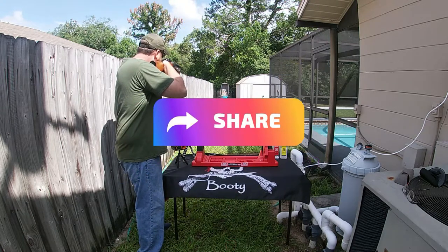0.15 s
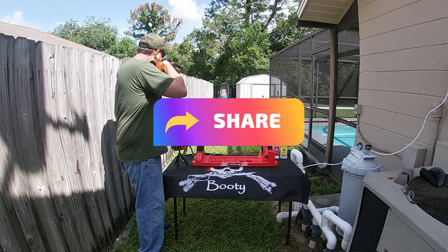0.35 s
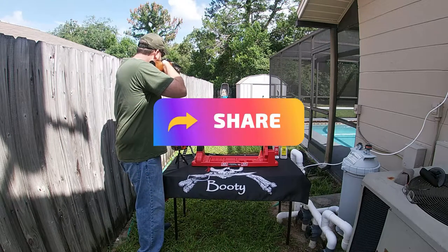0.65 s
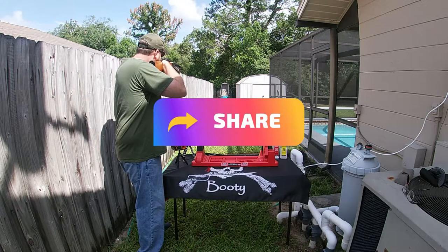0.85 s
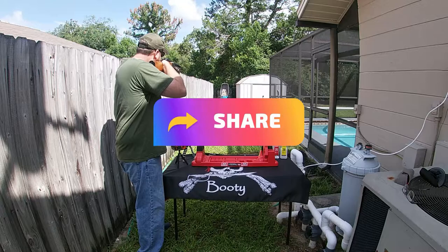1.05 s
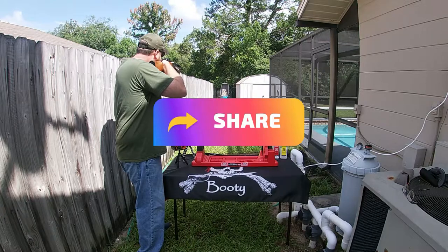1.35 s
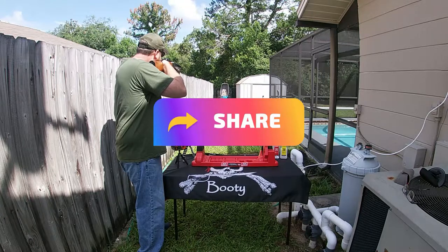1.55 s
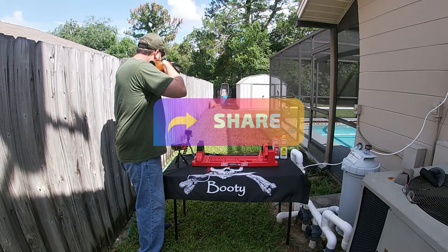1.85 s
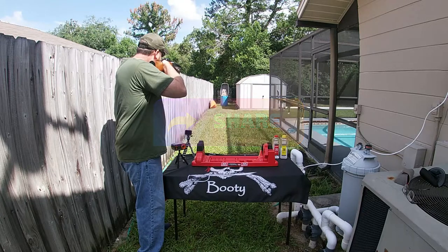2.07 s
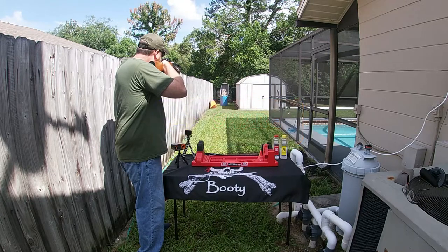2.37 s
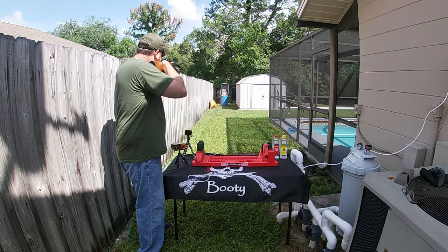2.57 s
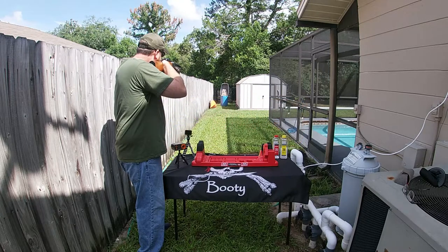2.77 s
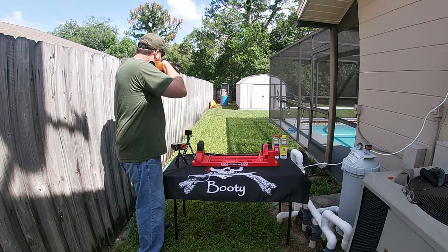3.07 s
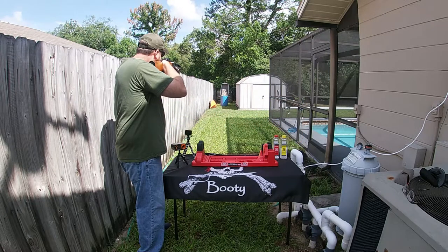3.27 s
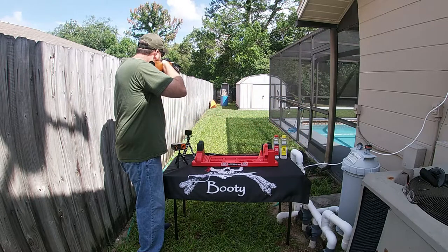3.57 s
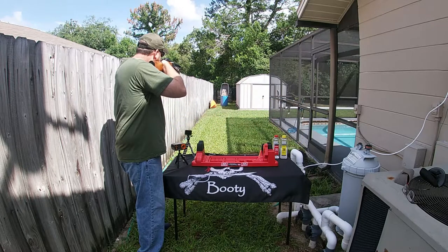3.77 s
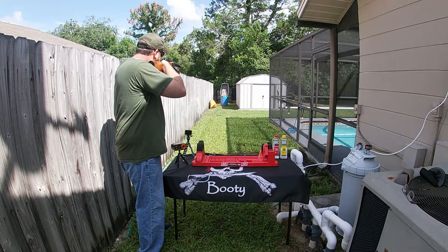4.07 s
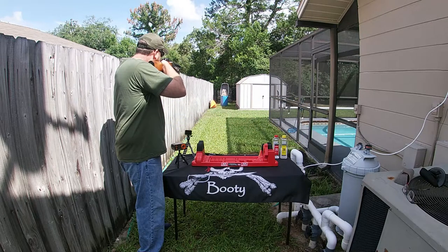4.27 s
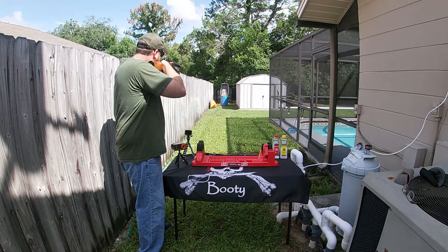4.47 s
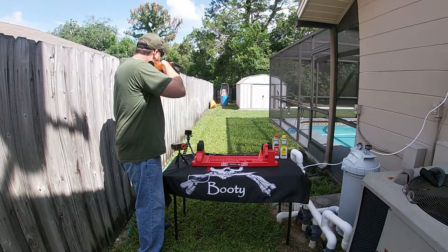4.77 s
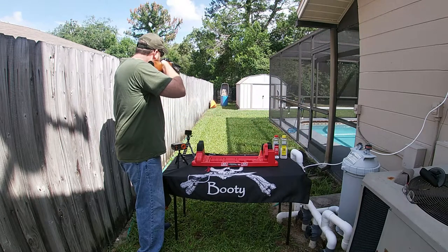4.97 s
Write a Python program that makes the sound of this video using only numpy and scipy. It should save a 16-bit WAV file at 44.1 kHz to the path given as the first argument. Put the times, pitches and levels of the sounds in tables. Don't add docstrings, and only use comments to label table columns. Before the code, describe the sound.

An electric airsoft rifle fires six single shots close to the microphone in a narrow yard between fence and house. Each is a brief rising motor whine, a hard piston clack and smaller action knocks. Five are followed about a quarter second later by a faint tick or ping on distant metal, a couple glancing onto wood. Gusty low wind and a dull outdoor wash lie underneath.

```python
import sys
import numpy as np
from scipy import signal
from scipy.fft import rfft, irfft, next_fast_len
from scipy.io import wavfile
from scipy.ndimage import uniform_filter1d

SR = 44100
rng = np.random.default_rng(int(sys.argv[2]) if len(sys.argv) > 2 else 0)


def put_to_file(sound):
    columns = np.atleast_2d(sound).T
    safe = np.clip(columns, -1, 1)
    whole_steps = np.round(safe * 32767)
    wavfile.write(sys.argv[1], SR, whole_steps.astype(np.int16))


def invert_db(x):
    u = np.asarray(x, float) / 20
    return 10 ** u


N = 226100

# t/s, buffeting level/dB
GUSTS = [(0.0, -43.5), (0.37, -56), (0.67, -27.5), (1.08, -48.5), (1.34, -38.5), (1.51, -41), (1.78, -30.5),
         (1.93, -44.5), (2.0, -38), (2.23, -51), (2.45, -38), (2.64, -46), (3.17, -30.5), (3.24, -38.5),
         (4.2, -51.5), (4.31, -42), (4.95, -48), (5.13, -43.5)]
# f/Hz, level/dB
BUFFET = [(15, -2), (35, 2.5), (60, 0.5), (100, -9), (170, -13), (300, -40.5), (3000, -100)]
# f/Hz, level/dB
RUMBLE = [(50, -36.5), (100, -3.5), (150, 5.5), (250, -4.5), (380, -13.5), (600, -39.5), (5000, -92.5)]
# f/Hz, level/dB, width/Hz
FAN_ORDERS = [(118.4, -52, 4.), (242.2, -53, 2.5)]
# t/s, f/Hz, level/dB
ENGINE = [(0, 352.8, -88), (2.099, 357.2, -69), (2.4, 358.6, -62), (3.051, 396.4, -55),
          (3.599, 376.4, -65.5), (4.598, 371, -62.5), (5.13, 361.3, -61)]
# f/Hz, level/dB
WASH = [(200, -28), (350, -5.5), (600, -8.5), (1200, -12), (2500, -23.5), (3300, -28), (4200, -35),
        (6500, -38), (8000, -50.5), (12500, -55), (15000, -68)]

# slam t/s, slam level/dB, treble toward microphone level/dB, spin-up stretch factor,
# f/Hz below which the shoulder damps the thump
SHOTS = [
    (0.0599, -11.5, 7, .93, 165),
    (.9100, -13, -2, .9, 235),
    (2.0065, -10.5, -0.5, .98, 90),
    (3.1429, -10, -1.5, 1.01, 90),
    (3.728, -10.5, -2, .86, 90),
    (4.3298, -10.5, -0.5, .98, 90),
]
TOOTH_DEPTHS = [.25, .4, .35, .9, .3, .4]
# t/s from the slam, gear mesh f/Hz, load level/dB
SPIN = [
    (-.072, 834, -31.5),
    (-.062, 977, -15.5),
    (-.039, 1198, -3.5),
    (-.013, 1957, -3),
    (.004, 2360, -0.9),
    (0.049, 2140, -3.5),
    (.12, 1510, -10.5),
    (.2, 810, -29.5),
    (.261, 493, -48.5),
]
# f/Hz, level/dB
GRIND = [(250, -14), (500, -13), (1000, -5.5), (2000, -7), (3500, -14.5), (6300, -20), (8500, -30.5),
         (10000, -48.5), (15500, -57.5)]
# f/Hz, level/dB
RELEASE = [(200, -20), (400, -0.5), (900, -11.5), (1800, -11.5), (3500, -7), (8000, -35), (15000, -56)]
# f/Hz, level/dB
SLAM = [(150, -33), (250, -1.5), (933, -3), (1340, -8), (1710, -5.5), (2000, -11.5), (3600, -5.5),
        (3860, -13.5), (4360, -16), (8860, -25.5), (10200, -46), (12800, -29), (15700, -50)]
# f/Hz, level/dB, t60/s
SHELL_MODES = [(522, -4.5, 0.43), (852, 0.5, 0.3), (1200, -3.5, .1), (1627, -4, 0.15), (1780, -6.5, 0.13),
               (2642, 9, 0.055), (3448, -25, 0.043), (3636, -20.5, 0.026), (4300, -14.5, 0.084)]
# f/Hz, level/dB, t60/s
THUMP_MODES = [(130.2, -8.5, 0.12), (189.6, -6, 0.07), (250.8, -12, 0.14)]
# f/Hz, level/dB
MUZZLE = [(300, -5.5), (1500, -2.5), (2900, 9.5), (4000, -5), (7500, -7), (10000, -16), (12500, -7.5),
          (15500, -45)]
# f/Hz, level/dB
RETURN = [(180, -49), (300, -3), (527, 0), (1620, -2.5), (1890, -8.5), (2120, -11.5), (3720, -13.5),
          (4110, -13), (4850, -18.5), (6860, -17), (8790, -25.5), (14000, -28), (15700, -58.5)]
# f/Hz, level/dB
LOCK = [(180, -42), (300, 0.5), (469, -1.5), (1850, -9), (2120, -31), (2630, -4), (3780, -11.5),
        (6640, -8.5), (7580, -14.5), (13100, -28), (15700, -35)]
# f/Hz, level/dB
LATCH = [(180, -37), (300, -7), (1940, -1.5), (3380, -8.5), (4320, -10), (4930, -22), (6840, -14.5),
         (9030, -29), (15000, -39)]
# f/Hz, level/dB, t60/s
ACTION_MODES = [(496, 2.5, 0.12), (1020, -24, 0.13), (1830, 9.5, 0.048), (4180, -8, 0.06),
                (5440, -12, 0.038), (7850, -3.5, 0.069)]
# f/Hz, level/dB, width/Hz
SPRING = [(6840, -6.5, 130), (6380, -13, 120), (5400, -11.5, 370), (9760, -19, 110)]
# t/s, level/dB
LATCHES = [
    (0.165, -5),
    (1.01, -11),
    (2.112, -8.5),
    (3.249, -8),
    (3.833, -22),
    (4.433, -8),
]
# t/s, level/dB
CREAKS = [
    (3.033, -53.5),
    (4.225, -57),
]
# delay t/s, level/dB
ECHOES = [(.0022, -13.5), (.0062, -8), (.0092, -7.5), (0.0135, -4), (0.018, -9), (0.02, -4.5), (0.024, -14)]
# f/Hz, t60/s
YARD_DECAY = [(100, 0.36), (400, 0.29), (1500, 0.4), (4000, 0.38), (9000, 0.27), (15000, 0.34)]

# f/Hz, rms level/dB, hold t/s, t60/s
POST = [(2482, -63, .04, .6), (6449, -71, .04, .3), (8683, -72, .004, .05)]
# f/Hz, rms level/dB, hold t/s, t60/s
GONG = [(6142, -44, .09, .25), (6131, -56, .03, .6), (12040, -59, .07, .45), (11990, -64, .01, .5),
        (14570, -62, .01, .4), (10570, -66, .01, .3), (8120, -76, .05, .6), (3850, -39, .002, .02),
        (4230, -56, .018, .06)]
# f/Hz, rms level/dB, hold t/s, t60/s
DISC = [(3285, -50, .014, .06), (3290, -66, .06, .35), (1000, -57, .02, .1), (4533, -70, .02, .2)]
# f/Hz, rms level/dB, hold t/s, t60/s
FRAME = [(7190, -53, .008, .055), (9190, -68, .02, .2)]
# t/s, target modes, target level/dB, frame level/dB
STRIKES = [
    (1.152, POST, 0, -1),
    (2.251, GONG, 0, -40),
    (3.392, DISC, -1, -25),
    (3.977, DISC, 0, -6),
    (4.582, DISC, -6, -5),
]
# t/s, f/Hz, rms level/dB
SHED_ECHOES = [
    (2.300, 4230, -56),
    (4.020, 4425, -60),
    (4.625, 4425, -57),
]
# t/s, level/dB, centre f/Hz
TICKS = [(1.1522, -26, 7140), (1.2042, -44, 6460), (2.2517, -22, 5880), (2.3014, -34, 6200),
         (3.3927, -25, 3260), (3.4435, -42, 3250), (3.9757, -26.5, 3280), (4.032, -39, 4430),
         (4.581, -25.5, 3420), (4.608, -37, 3040), (4.6335, -37, 4430)]
# t/s, level/dB, low edge f/Hz, high edge f/Hz, rattle t60/s
GLANCES = [
    (2.514, -39.5, 1260, 4010, 0.035),
    (2.566, -64, 2416, 5030, 0.033),
    (4.752, -43, 2580, 5500, 0.13),
    (4.807, -52, 2510, 6000, 0.068),
    (5.062, -76, 4000, 8060, 0.036),
]
# f/Hz, level/dB, t60/s
BOARD_MODES = [(1400, -6, .02), (1650, -1, .035), (2150, -1, .035), (2700, -3, .03), (3650, 2, .03),
               (4500, -6, .015)]


def evened(x):
    return x / np.sqrt(np.mean(x ** 2) + 1e-20)


def read(points, hz):
    f, value = np.transpose(points)
    return np.interp(np.log(hz + 1), np.log(f + 1), value)


def add(mix, s, sound):
    at = round(s * SR)
    sound = sound[max(-at, 0):]
    part = mix[max(at, 0):][:len(sound)]
    part += sound[:len(part)]


def colour(x, points):
    hz = abs(np.fft.fftfreq(4096, 1 / SR))
    gain = np.log(invert_db(np.maximum(read(points, hz), -100)))
    taps = np.fft.ifft(np.exp(gain - 1j * signal.hilbert(gain).imag)).real[:2048]
    return signal.oaconvolve(x, taps)[:len(x)]


def noise(points, size=N):
    padded = next_fast_len(size)
    spectrum = rfft(rng.standard_normal(size), padded)
    spectrum = spectrum * invert_db(read(points, np.fft.rfftfreq(padded, 1 / SR)))
    return evened(irfft(spectrum, padded)[:size])


def resonate(x, hz, width):
    turn = np.exp(2j * np.pi * np.cumsum(hz * np.ones(len(x))) / SR)
    r = np.exp(-np.pi * width / SR)
    return 2 * (turn * signal.lfilter([1 - r], [1, -r], x / turn)).real


def whistle(hz, width, size=N):
    once = resonate(rng.standard_normal(size), hz, width)
    return evened(resonate(once, hz, width))


def slow_noise(size, window):
    return evened(uniform_filter1d(uniform_filter1d(rng.standard_normal(size), window), window))


def wind():
    calm_db, rumble_db, rumble_share = -46, -46.5, 0.19
    gust_db = np.interp(np.arange(N) / SR, *np.transpose(GUSTS))
    lumps_db = 2.4 * slow_noise(N, 1500)
    rumble_db = rumble_db + rumble_share * (gust_db - calm_db)
    buffeting = invert_db(gust_db + 1.5 + lumps_db) * noise(BUFFET)
    return buffeting + invert_db(rumble_db + lumps_db) * noise(RUMBLE)


def fan():
    return sum(invert_db(db) * whistle(hz, 2 * width) for hz, db, width in FAN_ORDERS)


def engine_and_wash():
    wash_db, engine_mean_db, engine_share = -55.5, -65.5, .2
    duck_db, recover_s = -0.5, 0.21
    t = np.arange(N) / SR
    s, hz, db = np.transpose(ENGINE)
    engine_db = np.interp(t, s, db)
    engine = invert_db(engine_db) * whistle(np.interp(t, s, hz), 9.1)
    for slam_s, *_ in SHOTS:
        wash_db = wash_db + duck_db * (t > slam_s) * np.exp(-abs(t - slam_s) / recover_s)
    wash_db = wash_db + engine_share * (engine_db - engine_mean_db)
    return engine + invert_db(wash_db) * noise(WASH)


def motor(stretch, tooth_depth):
    grind_db, whine_db = -24, -22.5
    engage_s, engage_rise_s, free_db = -.041, 0.0026, -12.5
    sag_db_per_s, slack_db_per_s, slack_db = -150, -520, -23.5
    s, *columns = np.transpose(SPIN)
    s = np.where(s < 0, s * stretch, s)
    t = np.arange(s[0], s[-1], 1 / SR)
    hz, load_db = (np.interp(t, s, c) for c in columns)
    since = t - engage_s * stretch
    line_db = free_db * np.clip(-since / engage_rise_s, 0, 1)
    line_db += sag_db_per_s * np.maximum(since, 0) + slack_db_per_s * np.maximum(t, 0)
    teeth = 1 + tooth_depth * np.cos(2 * np.pi * 98 * (t + .035))
    upper_hz = 1.25 * hz + 1400
    mesh = np.sin(2 * np.pi * np.cumsum(hz) / SR) + 0.6 * whistle(hz, 450, size=len(t))
    upper = np.sin(2 * np.pi * np.cumsum(upper_hz) / SR) + 1.4 * whistle(upper_hz, 400, size=len(t))
    whine = mesh + invert_db(-10) * upper * np.clip((hz - 1200) / 250, 0, 1)
    whine = teeth * invert_db(whine_db + 3 + np.maximum(line_db, slack_db)) * whine
    return s[0], invert_db(load_db) * (whine + invert_db(grind_db) * noise(GRIND, size=len(t)))


def ring(modes, t):
    detune = .012
    out = np.zeros(len(t))
    for hz, db, t60 in modes:
        mode_hz = hz * (1 + detune * rng.standard_normal())
        out += invert_db(db - 60 * t / t60) * np.sin(2 * np.pi * mode_hz * t)
    return out / abs(out).max()


def blow_maker(spectrum, modes, rise, t60, ring_db, spring_db):
    t = np.arange(8000) / SR
    shape = (1 - np.exp(-t / rise)) * invert_db(-60 * t / t60)
    habit = noise(spectrum, size=len(t))
    swell = (t / .013) ** 5 * np.exp(5 - 5 * t / .013)
    spring = evened(sum(invert_db(db) * whistle(hz, width, size=len(t)) for hz, db, width in SPRING))

    def blow():
        rattle = shape * (0.81 * habit + 0.7 * noise(spectrum, size=len(t)))
        return rattle + invert_db(ring_db) * ring(modes, t) + invert_db(spring_db) * swell * spring
    return blow


def thump(shoulder_hz):
    shoulder_db, lift_db = -7, 3
    t = np.arange(8000) / SR
    out = np.zeros(len(t))
    lift = lift_db * (shoulder_hz > THUMP_MODES[0][0])
    for hz, db, t60 in THUMP_MODES:
        change_db = shoulder_db if hz < shoulder_hz else lift
        out += invert_db(db + change_db - 60 * t / t60) * np.sin(2 * np.pi * hz * t)
    return -(1 - np.exp(-t / 0.01)) * out


def impulse(spectrum, size):
    pulse = colour(np.exp(-np.arange(size) / SR / .00005), spectrum)
    return pulse / abs(pulse).max()


def rifle():
    release_s, return_s, lock_s = -.0105, .0618, .1413
    return_db, lock_db = -13.5, -22.5
    start_db, start_lag_s = -45.5, .008
    lead = .1
    out = np.zeros(N)
    slam = blow_maker(SLAM, SHELL_MODES, 0.00093, 0.088, 2.0, -27.5)
    back = blow_maker(RETURN, ACTION_MODES, 0.0025, 0.052, -1, -15.5)
    lock = blow_maker(LOCK, ACTION_MODES, 0.0008, 0.074, 0.95, -13.5)
    latch = blow_maker(LATCH, ACTION_MODES, 0.00025, 0.052, -19.5, -40.0)
    release = blow_maker(RELEASE, SHELL_MODES, .001, 0.098, -24, -54.0)
    pop = impulse(MUZZLE, 800)
    snap = impulse(RETURN, 8000)
    for setting, (latch_s, latch_db), tooth_depth in zip(SHOTS, LATCHES, TOOTH_DEPTHS):
        s, slam_db, treble_db, stretch, shoulder_hz = setting
        shot = np.zeros(SR // 2)
        start, whine = motor(stretch, tooth_depth)
        add(shot, lead + start, whine)
        add(shot, lead + start + start_lag_s, invert_db(start_db) * latch())
        add(shot, lead + release_s, invert_db(slam_db - 9) * release())
        add(shot, lead - .004, thump(shoulder_hz))
        add(shot, lead - .001, invert_db(slam_db) * slam())
        add(shot, lead + .001, -invert_db(slam_db + 10) * pop)
        add(shot, lead + return_s, invert_db(return_db) * (back() + snap))
        add(shot, lead + lock_s, invert_db(lock_db) * (lock() + 1.3 * snap))
        add(shot, lead + latch_s - s, invert_db(latch_db - 11.0) * (latch() - 1.1 * snap))
        aim = [(2500, 0.0072), (6000, treble_db), (10000, treble_db), (13000, -.3 * treble_db)]
        add(out, s - lead, colour(shot, aim))
    for s, db in CREAKS:
        add(out, s, invert_db(db) * latch())
    return out


def yard(x, echo_db, tail_db):
    taps = np.zeros(SR)
    at = np.arange(300, SR - 20, 20) + rng.integers(0, 20, (SR - 301) // 20)
    taps[at] = rng.choice([-1., 1.], len(at))
    hz, t, z = signal.stft(taps, SR, nperseg=256)
    decay = invert_db(-60 * t / read(YARD_DECAY, hz)[:, None])
    tail = signal.istft(z * decay, SR, nperseg=256)[1]
    tail *= invert_db(tail_db) / np.linalg.norm(tail)
    for s, db in ECHOES:
        tail[round(s * SR)] += invert_db(db + echo_db)
    return x + signal.fftconvolve(x, tail)[:N]


def partial(hz, db, hold, t60):
    t = np.arange(SR // 2) / SR
    flutter = invert_db(2.5 * slow_noise(len(t), 250))
    rise = 1 - np.exp(-t / (.1 * hold))
    decay = invert_db(db + 4.5 - 60 * np.maximum(t - hold, 0) / t60)
    return flutter * decay * rise * np.sin(2 * np.pi * hz * t)


def struck_targets():
    shed_s, shed_db = .0527, -13
    out = np.zeros(N)
    for s, modes, target_db, frame_db in STRIKES:
        struck = sum(partial(*m) for m in modes)
        frame = sum(partial(*m) for m in FRAME)
        add(out, s, invert_db(target_db) * struck + invert_db(frame_db) * frame)
    out = out + invert_db(shed_db) * np.roll(out, round(shed_s * SR))
    for s, hz, db in SHED_ECHOES:
        add(out, s, partial(hz, db, hold=.034, t60=.045))
    return out


def ticks():
    out, t = np.zeros(N), np.arange(600) / SR
    for s, db, hz in TICKS:
        spectrum = [(800, -12), (2000, -3), (hz, 0), (12000, -10), (15500, -26)]
        add(out, s, invert_db(db - 12.5) * noise(spectrum, size=600) * invert_db(-60 * t / .012))
    return out


def glances():
    out, t = np.zeros(N), np.arange(6000) / SR
    for s, db, low_hz, high_hz, t60 in GLANCES:
        band = [(0.42 * low_hz, -26), (low_hz, 0), (high_hz, -3), (1.68 * high_hz, -22),
                (13000, -38), (15000, -60)]
        rattle = rng.standard_normal(6000) * invert_db(-60 * t / t60) * np.minimum(t / (0.03 * t60), 1)
        driven = signal.oaconvolve(rattle, ring(BOARD_MODES, t[:4000]))[:6000]
        hit = rattle + invert_db(-25.5) * driven + invert_db(2.5) * ring(BOARD_MODES, t)
        hit = colour(hit, band)
        add(out, s, invert_db(db + 11.0) * hit / abs(hit).max())
    return out


def scene():
    mono = wind() + fan() + engine_and_wash()
    mono += yard(rifle(), echo_db=-9.0, tail_db=-8.5)
    mono += struck_targets() + yard(ticks() + glances(), echo_db=-12.0, tail_db=-1.5)
    return np.array([mono, mono])


def roll_off(x):
    return signal.sosfilt(signal.butter(12, 15850, fs=SR, output="sos"), x)


def record(dry):
    limited = dry / (1 + dry ** 6) ** (1 / 6)
    band_edge = signal.firwin(511, 15600, window=("kaiser", 9), fs=SR)
    x = signal.oaconvolve(limited, band_edge[None], "same")
    top = signal.sosfilt(signal.butter(8, 12000, "high", fs=SR, output="sos"), x[1])
    left = x[0] - 0.24 * top
    right = x[1] + invert_db(2) * np.roll(top, 400)
    return roll_off(np.array([left, right]))


dry = scene()
out = record(dry)
put_to_file(out)
```